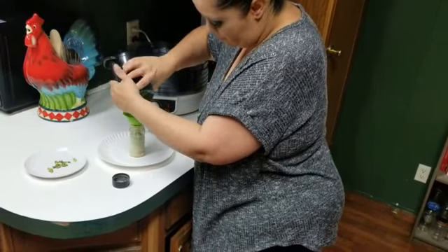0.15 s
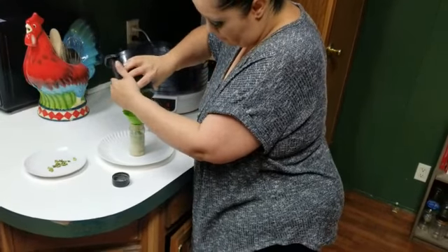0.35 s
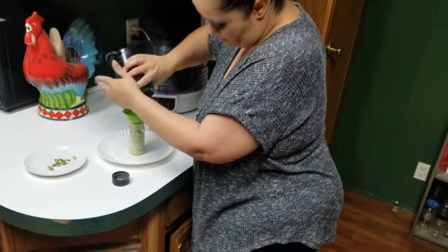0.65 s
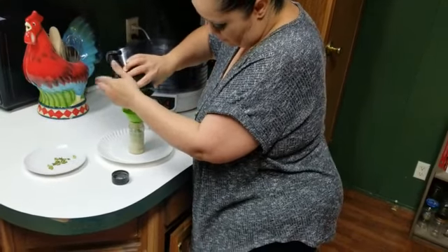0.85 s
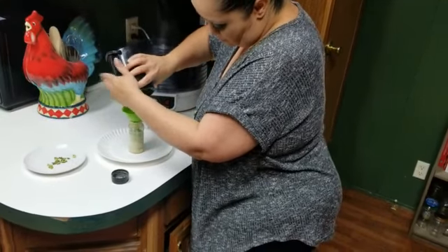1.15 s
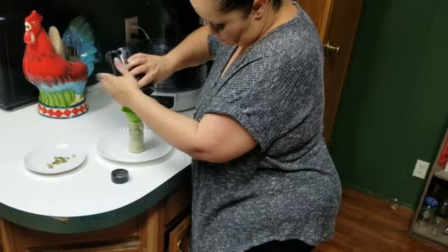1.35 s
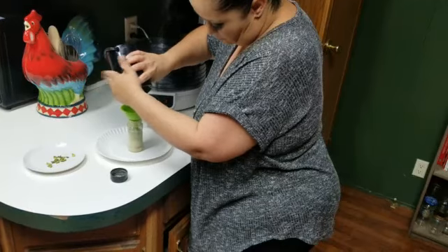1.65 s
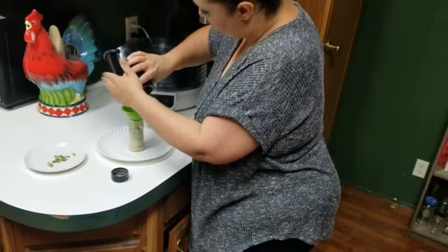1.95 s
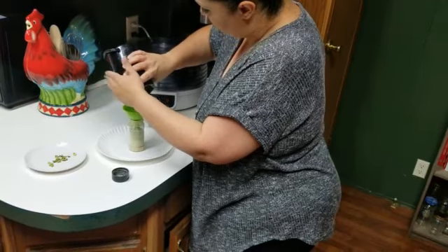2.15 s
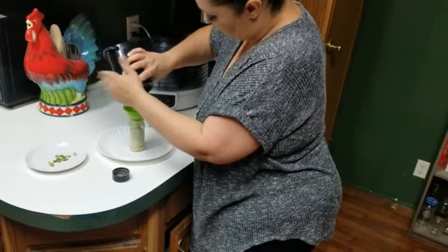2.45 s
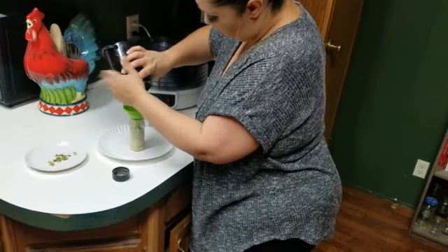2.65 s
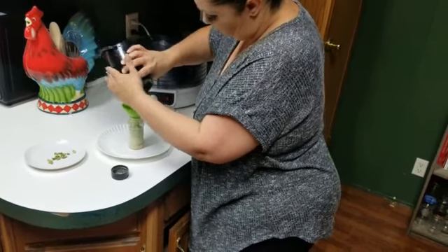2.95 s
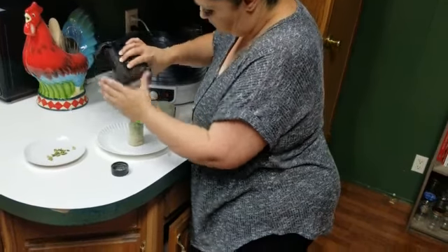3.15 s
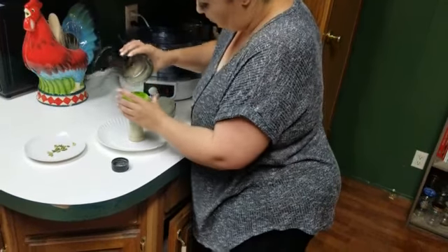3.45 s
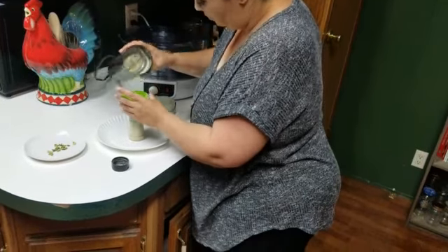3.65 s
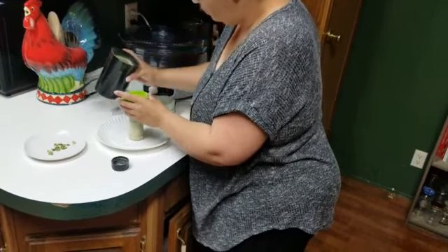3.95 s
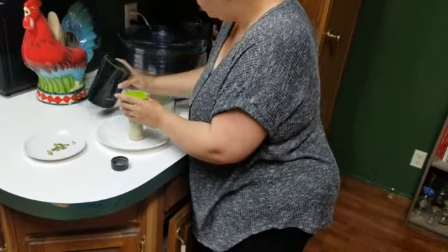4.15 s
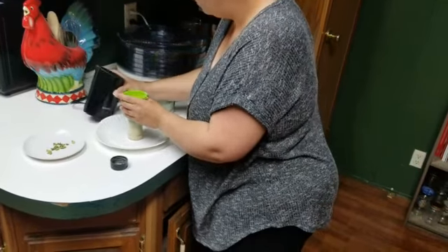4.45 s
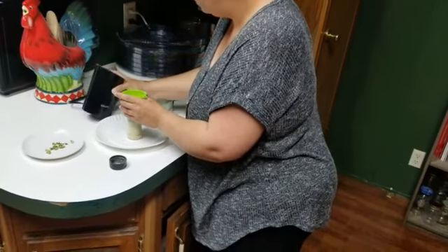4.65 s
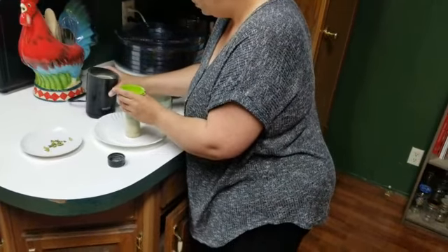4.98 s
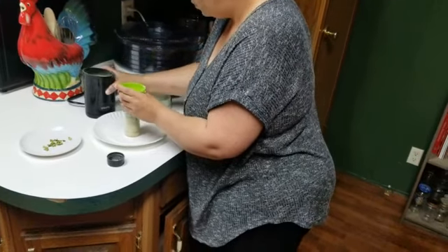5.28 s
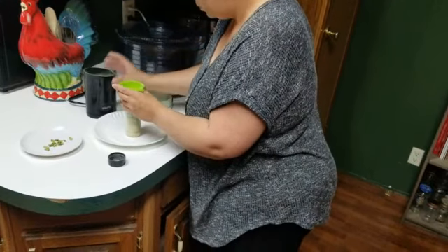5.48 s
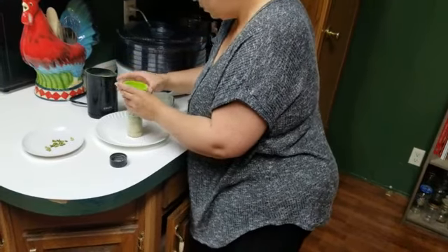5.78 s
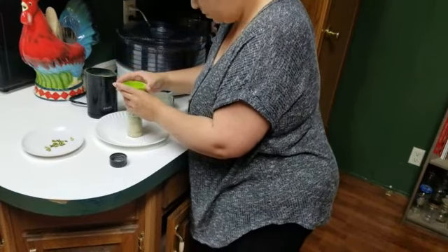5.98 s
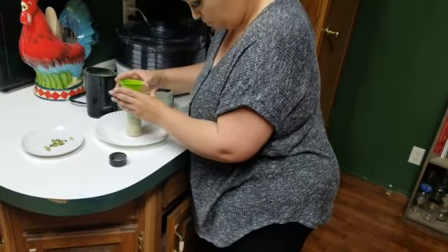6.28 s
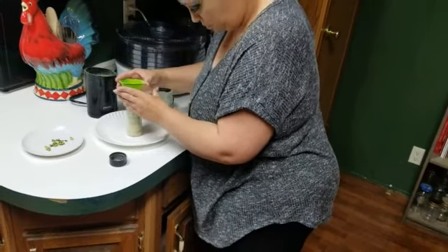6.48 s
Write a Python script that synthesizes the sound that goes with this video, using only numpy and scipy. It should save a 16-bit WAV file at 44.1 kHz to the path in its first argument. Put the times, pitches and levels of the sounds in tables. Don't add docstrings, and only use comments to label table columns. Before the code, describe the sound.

A small, hard kitchen with a steady low appliance hum near 120 hertz, wavering fan tones, soft rumble and faint hiss. From 0.1 seconds a palm slaps a tilted spice grinder evenly, about five times a second: light and uneven at first, firmer after 0.9, strongest near 2.9, each a fleshy smack with a brief hollow cup ring and dense short echoes. A duller, weaker pat ends the series around 3.1 to 3.2. The hum, faintest near 2, swells around 4. Faint skin rustles come at 3.5 and 3.9, with small cord and plug ticks from 3.7 to 4.0. At 4.35 and 4.58 the rim strikes the counter: two very loud, heavy, booming knocks, slightly overloaded. Dull base thumps follow at 4.9 and, weaker, 5.2. Tiny finger rustles at 5.4 to 5.6 and 6.6 sit over the sinking hum until the end, about 6.6.

```python
import sys
import numpy as np
from scipy import signal
from scipy.fft import rfft, irfft
from scipy.io import wavfile
from scipy.ndimage import uniform_filter1d

SR = 44100
rng = np.random.default_rng(int(sys.argv[2]) if len(sys.argv) > 2 else 0)


def dump(signal):
    limited = np.clip(np.atleast_2d(signal).T, -1, 1)
    pcm = np.round(limited * 32767).astype(np.int16)
    wavfile.write(sys.argv[1], SR, pcm)


def level_to_linear(level):
    exponent = np.asarray(level, float) / 20
    return 10 ** exponent


N = 292118

# pitch [Hz], level [dB], time to fade by 60 dB [s].
COUNTER_MODES = [(52, -7.5, 0.37), (68.1, -0.5, 0.42), (99.6, 3.5, 0.29), (141.6, 4.5, 0.24),
                 (217.5, -2.5, .3), (299, -6.5, 0.092), (393.3, -10.5, 0.087), (556, -16.5, 0.095),
                 (790, -16.5, 0.18), (1100, -10.5, 0.11), (1200, -34.5, 0.079), (2130, -21, 0.28),
                 (1977, -13.5, 0.21), (2327, -13, 0.088), (2420, -14.5, 0.2), (2696, -10, .1),
                 (3948, -26.5, .08), (5740, -9.5, 0.057)]
# frequency [Hz], likeness from 0 to 1.
LIKENESS = [(30, .98), (120, .98), (250, .93), (500, .75), (1000, .4), (3000, .1), (12000, .02)]


def evened(x):
    return x / np.sqrt(np.mean(x ** 2) + 1e-20)


def read(points, hz):
    f, value = np.transpose(points)
    return np.interp(np.log(hz + 1), np.log(f + 1), value)


def add(mix, start_s, sound):
    part = mix[:, round(start_s * SR):][:, :sound.shape[1]]
    part += sound[:, :part.shape[1]]


def causal(gain_db):
    cepstrum = irfft(np.maximum(gain_db, -100) * np.log(10) / 20)
    half = len(cepstrum) // 2
    cepstrum[1:half] *= 2
    cepstrum[half + 1:] = 0
    return irfft(np.exp(rfft(cepstrum)))


def whistle(hz, width_hz, size):
    r = np.exp(-np.pi * width_hz / SR)
    slow = rng.standard_normal(size) + 1j * rng.standard_normal(size)
    for _ in range(2):
        slow = signal.lfilter([1 - r], [1, -r], slow)
    return evened((slow * np.exp(2j * np.pi * hz * np.arange(size) / SR)).real)


def right_noise(left, other, hz):
    same = np.clip(read(LIKENESS, hz), -1, 1)
    if left.ndim == 2:
        same = same[:, None]
    return same * left + np.sqrt(1 - same ** 2) * other


def room(size):
    # frequency [Hz], time to fade by 60 dB [s].
    fade_times = [(60, 0.79), (250, 0.49), (1000, 0.55), (2500, 0.47), (6000, 0.43), (14000, 0.25)]
    hz, t = np.fft.rfftfreq(512, 1 / SR), np.arange(size // 128 + 2) * 128 / SR
    a, b, c, d = rng.standard_normal((4, len(hz), len(t)))
    left = a + 1j * b
    z = np.array([left, right_noise(left, c + 1j * d, hz)])
    clumps = uniform_filter1d(rng.standard_normal(a.shape), size=4, axis=0)
    clumps = uniform_filter1d(clumps, size=8, axis=1)
    z = z * level_to_linear(2.5 * evened(clumps))
    z = z * level_to_linear(-60 * t / read(fade_times, hz)[:, None])
    tail = signal.istft(z, nperseg=512, noverlap=384)[1][:, :size]
    t = np.arange(size) / SR
    tail = tail * (1 - np.exp(-t / 0.0041)) * (1 + 3.6 * np.exp(-t / 0.07))
    return tail / np.linalg.norm(tail[0])


def hit(row, colour, modes, contact_s, ring_db, wander, wet_db, pan_db, dull_hz, mid_db, mid_share,
        rise_s, hump_db, hollow_db):
    start_s, blow_db, thump_db, bright_db, hollow_hz = row
    t, hz = np.arange(32768) / SR, np.fft.rfftfreq(8192, 1 / SR)

    contact = rng.standard_normal(len(t)) * (1 - np.exp(-t / rise_s)) * np.exp(-t / contact_s)
    ragged = evened(uniform_filter1d(rng.standard_normal(len(t)), 24))
    contact = contact * level_to_linear(0.99 * ragged)
    crack = contact / np.linalg.norm(contact) + level_to_linear(wet_db) * room(len(t))

    ring, humps = 0, 0
    for f, db, t60 in modes:
        a, b = rng.standard_normal(2)
        pitch = f * (1 + wander * b)
        tone = level_to_linear(db + 60 * wander * a - 60 * t / t60) * np.sin(2 * np.pi * pitch * t)
        ring = ring + tone * (1 - np.exp(-t * f / 0.45))
        humps = humps + level_to_linear(2.5 * a) / (1 + ((hz - pitch) / (0.06 * f)) ** 2)
    ring = level_to_linear(ring_db) * ring * (1 - np.exp(-t / 0.00078))

    click = causal(read(colour, hz) + hump_db * humps)
    click = click / np.linalg.norm(click)
    sound = ring + 12 * signal.fftconvolve(crack, click[None], axes=1)[:, :len(t)]

    mid_db = mid_db + mid_share * thump_db
    tilt = [(20, thump_db - 31.5), (50, thump_db), (350, thump_db), (900, mid_db), (2000, 0),
            (dull_hz, 0), (2 * dull_hz, bright_db), (4 * dull_hz, 0.92 * bright_db)]
    hollow = hollow_db / (1 + ((hz - hollow_hz) / (0.12 * hollow_hz)) ** 2)
    tilt_db = blow_db + read(tilt, hz) + hollow
    shade_db = pan_db / 2 * read([(200, 0.14), (2000, 1)], hz)
    left = causal(tilt_db + shade_db)
    right = np.roll(causal(tilt_db - shade_db), 4)
    return start_s - 0.001, signal.fftconvolve(sound, np.array([left, right]), axes=1)[:, :len(t)]


def appliance_hum():
    # time [s], level [dB].
    hum_level = [(0.0, -40.5), (0.9, -44.5), (1.4, -53), (1.85, -55), (2.1, -55), (2.4, -49.5), (3.0, -38),
                 (4.1, -35.5), (5.2, -38.5), (5.92, -42), (6.25, -48), (6.62, -49.5)]
    hum_hz, node_s, pan_db, lead_rad = 120.02, 2.12, 1.5, 0.57
    t = np.arange(N) / SR
    level = level_to_linear(np.interp(t, *np.transpose(hum_level)) + np.array([[0.5], [-0.5]]) * pan_db)
    flip = np.pi / (1 + np.exp(-(t - node_s) / 0.092))
    lead = np.array([[lead_rad], [0]])
    return np.sqrt(2) * level * np.sin(2 * np.pi * hum_hz * t - flip + lead)


def fan():
    # pitch [Hz], level [dB], width [Hz].
    fan_lines = [(64, -87.5, 2.18), (145.5, -54, 3.1), (218.5, -62, 3.3), (296, -74.5, 26),
                 (424.5, -65.5, 11)]
    return sum(level_to_linear(db) * whistle(hz, width_hz, N) for hz, db, width_hz in fan_lines)


def air_rumble():
    # frequency [Hz], level [dB per Hz].
    air_colour = [(20, -66), (40, -70), (90, -63), (180, -65), (300, -70), (450, -79), (650, -90),
                  (1000, -96), (2000, -101), (5000, -107), (8500, -115), (10500, -107), (13000, -97),
                  (16000, -100)]
    # time [s], rumble level [dB].
    swell = [(0, -2.5), (.8, 0.6), (2.2, -4.5), (2.8, -2.5), (3.4, -1), (3.9, 3.5), (5.3, -4), (6, -4.5),
             (6.62, -0.8)]
    hiss_db = -69.5
    t, hz = np.arange(N) / SR, np.fft.rfftfreq(N, 1 / SR)
    left, other = rfft(rng.standard_normal((2, N)))
    air = irfft(np.array([left, right_noise(left, other, hz)]) * level_to_linear(read(air_colour, hz)), N)
    hiss = irfft(rfft(air.mean(0)) * (hz > 1000), N)
    low_db = np.interp(t, *np.transpose(swell))
    deep_db = 2 + 0.53 * low_db - 0.9 * t
    deep = irfft(rfft(air) * (hz < 120), N)
    low = irfft(rfft(air) * ((hz >= 120) & (hz < 600)), N)
    air = air + deep * (level_to_linear(deep_db) - 1) + low * (level_to_linear(low_db) - 1)
    return level_to_linear(hiss_db) * air / hiss.std()


def palm_slaps(mix):
    # start [s], blow [dB], cup thump [dB], skin brightness [dB], hollow under the blow [Hz].
    slaps = [(0.087, -45.5, -4, -3, 1560), (0.2836, -41, -10, -4, 3260), (0.4975, -48.5, -11, -6, 1600),
             (0.6934, -46.5, -1.5, -0.5, 1070), (0.882, -36.5, -3, -7, 1280), (1.0715, -37, -0.5, -2, 2070),
             (1.26, -31, -2, -9, 2100), (1.4644, -33, 1.5, -2.5, 2300), (1.6588, -37, 4.5, -2, 1300),
             (1.8691, -34, -0.5, -5.5, 1100), (2.0761, -36, -0.5, -3.5, 2450),
             (2.2694, -33.5, 1.5, -4, 2300), (2.4686, -31, -2.5, -7, 2920), (2.6635, -29, -1.5, -7.5, 2900),
             (2.8595, -26.5, -4.5, -10, 1830), (3.0691, -44.5, 8.5, -16, 840), (3.1886, -59, 1, -12, 1100)]
    # frequency [Hz], level [dB].
    palm = [(120, -3), (300, -1.5), (700, -2.5), (1100, -1), (1500, -6), (2300, -7.5), (3500, -7.5),
            (6000, -1), (9000, -6), (12500, -2.5), (15800, -4.5), (17000, -41)]
    # pitch [Hz], level [dB], time to fade by 60 dB [s].
    cup_modes = [(262.4, 7.5, 0.083), (464, -1.5, 0.07), (1056, -16, 0.062), (1240, -30, 0.059),
                 (2300, -14, 0.28), (2970, -16, 0.1), (5500, -24, 0.1), (6900, 0, 0.13)]
    for row in slaps:
        add(mix, *hit(row, palm, cup_modes, contact_s=0.0038, ring_db=-9.5, wander=0.0396, wet_db=7,
                      pan_db=-3, dull_hz=3860, mid_db=-5, mid_share=0.66, rise_s=0.0011,
                      hump_db=2.5, hollow_db=6))


def skin_rubs(mix):
    # start [s], length [s], level [dB], pitch [Hz], width [Hz].
    rubs = [(3.49, .09, -66, 3100, 600), (5.47, .14, -70, 3100, 700), (3.92, .13, -62, 6000, 7000),
            (4.302, .06, -60, 8000, 9000), (5.42, .06, -67, 7000, 10000), (6.58, .04, -68, 7000, 9000),
            (1.845, .025, -60, 4000, 6000)]
    for start_s, length_s, db, hz, width_hz in rubs:
        t = np.arange(round(length_s * SR)) / SR
        shape = np.minimum(t / 0.0036, 1) * (1 - t / length_s)
        grains = np.array([whistle(hz, width_hz, len(t)), whistle(hz, width_hz, len(t))])
        add(mix, start_s, level_to_linear(db) * shape * grains)


def cord_ticks(mix):
    # start [s], blow [dB], thump [dB], brightness [dB], hollow under the blow [Hz].
    ticks = [
        (3.6994, -41.5, -11, -24, 1038),
        (3.8525, -33.5, -1, -28, 1930),
        (3.914, -30.5, -3, -1.5, 1500),
        (3.9912, -38.5, -12.5, -5, 1150),
        (5.4251, -57.5, -1.5, 8, 2500),
    ]
    # frequency [Hz], level [dB].
    plug = [(180, -33.5), (300, -12), (961, -4), (1390, -18), (1530, -16.5), (5340, -14.5), (9090, -23.5),
            (14700, -20.5), (16000, -24)]
    # pitch [Hz], level [dB], time to fade by 60 dB [s].
    cord_modes = [(831.6, 7, 0.14), (1150, 9, 0.23), (1943, 14, .06), (2900, -16, .05)]
    for row in ticks:
        add(mix, *hit(row, plug, cord_modes, contact_s=0.0035, ring_db=-27, wander=0.014, wet_db=2.5,
                      pan_db=-3, dull_hz=2500, mid_db=-8.5, mid_share=-0.8, rise_s=0.0018,
                      hump_db=2, hollow_db=6))


def rim_knocks(mix):
    # start [s], blow [dB], thump [dB], brightness [dB], hollow under the blow [Hz].
    knocks = [
        (4.347, -9, -5, 5, 2200),
        (4.584, -8.5, -4.5, 1.8, 2176),
    ]
    # frequency [Hz], level [dB].
    rim = [(30, -46), (70, -10.5), (150, -0.5), (370, -7.5), (660, -18), (1100, -20.5), (2300, -23.5),
           (3300, -23.5), (5800, -29), (8500, -40), (13500, -37), (15800, -34.5), (17000, -57.5)]
    for row in knocks:
        add(mix, *hit(row, rim, COUNTER_MODES, contact_s=0.006, ring_db=-5, wander=0.0028, wet_db=2,
                      pan_db=-3, dull_hz=3100, mid_db=-1, mid_share=0.29, rise_s=0.0022,
                      hump_db=2.5, hollow_db=3.5))


def base_rocks(mix):
    # start [s], blow [dB], thump [dB], brightness [dB], hollow under the blow [Hz].
    rocks = [
        (4.8824, -39.5, 17, -14.5, 2300),
        (5.1971, -47.5, 14.8, -20, 2744),
        (5.2346, -66, 16, 2, 2150),
    ]
    # frequency [Hz], level [dB].
    base = [(30, -44), (70, -10.5), (140, -3.5), (250, -6.5), (420, -13.5), (700, -19.5), (1100, -20),
            (2400, -23.5), (3300, -25.5), (6000, -15), (16000, -52)]
    for row in rocks:
        add(mix, *hit(row, base, COUNTER_MODES[2:], contact_s=0.01, ring_db=-6, wander=0.01, wet_db=7,
                      pan_db=-4, dull_hz=3150, mid_db=-4, mid_share=0.65, rise_s=0.002,
                      hump_db=2, hollow_db=6.5))


def scene():
    appliances = appliance_hum() + fan() + air_rumble()
    hands = np.zeros((2, N))
    palm_slaps(hands)
    skin_rubs(hands)
    cord_ticks(hands)
    rim_knocks(hands)
    base_rocks(hands)
    return level_to_linear(4) * hands + appliances


def roll_off(x):
    return signal.sosfilt(signal.butter(12, 16420, fs=SR, output="sos"), x)


def record(dry):
    edge = signal.firwin(255, 15950, window=("kaiser", 8), fs=SR)
    mix = signal.oaconvolve(np.clip(dry, -1, 1), edge[None], "same")
    return roll_off(mix)


dry = scene()
out = record(dry)
dump(out)
```